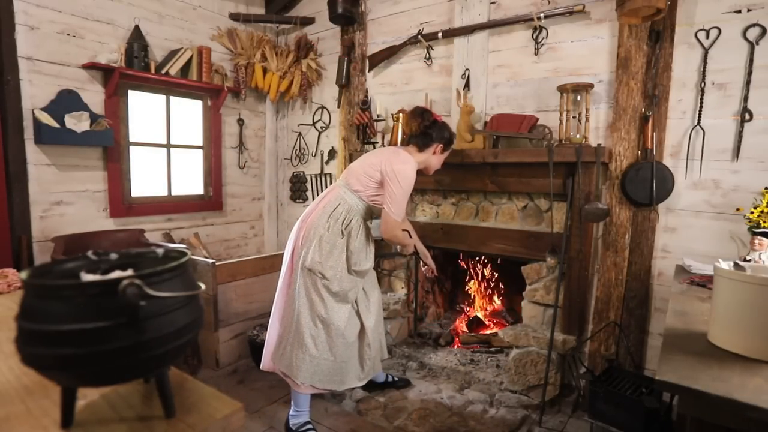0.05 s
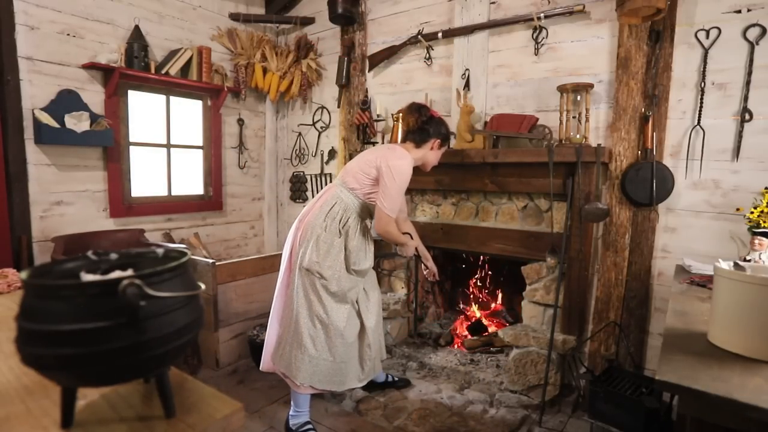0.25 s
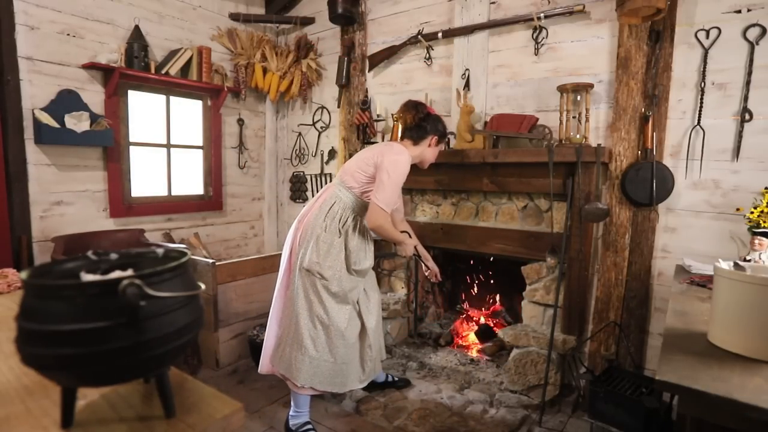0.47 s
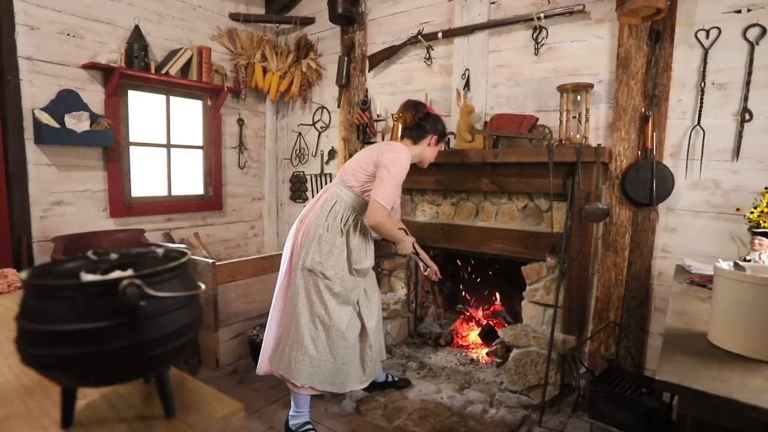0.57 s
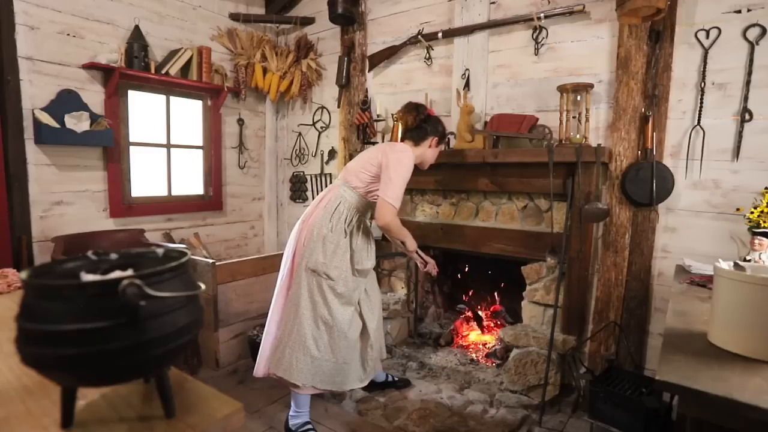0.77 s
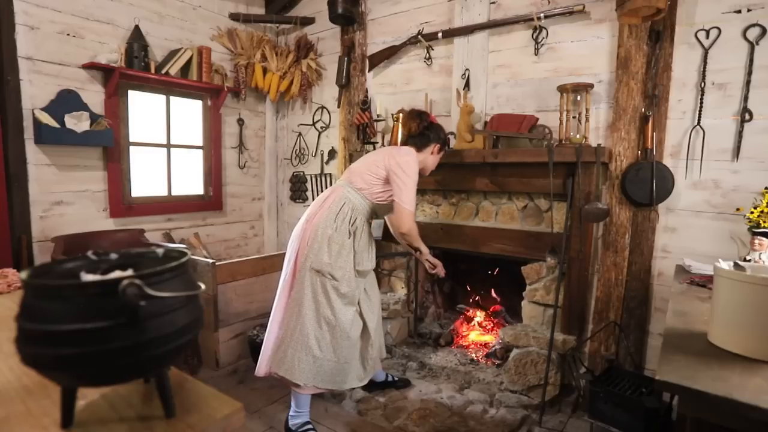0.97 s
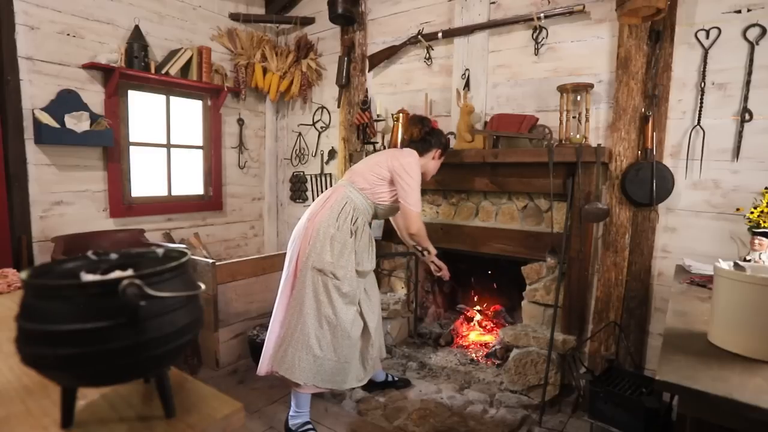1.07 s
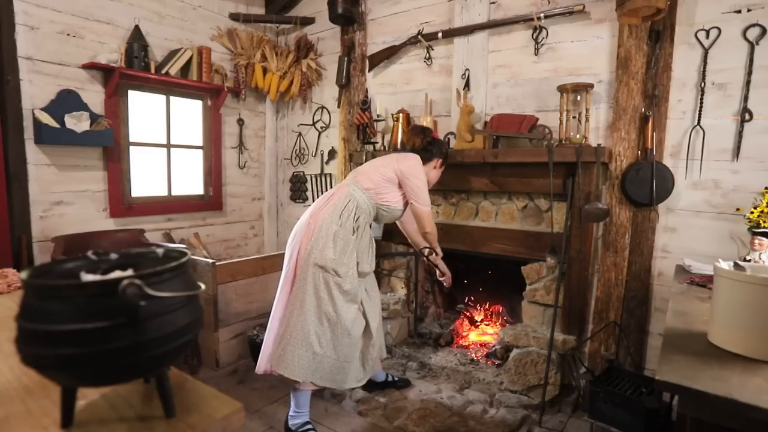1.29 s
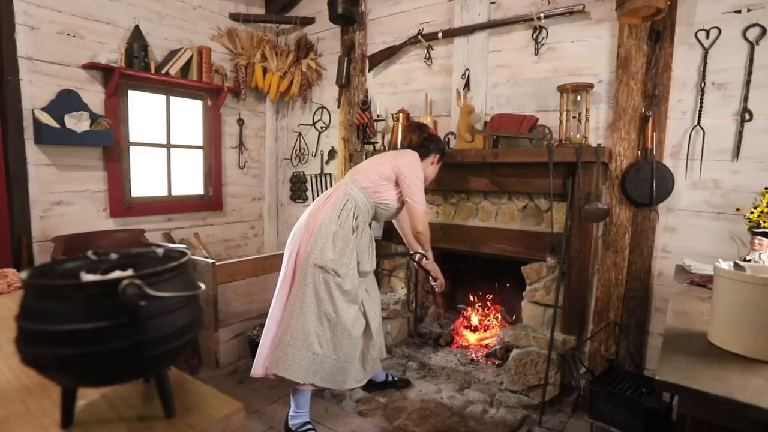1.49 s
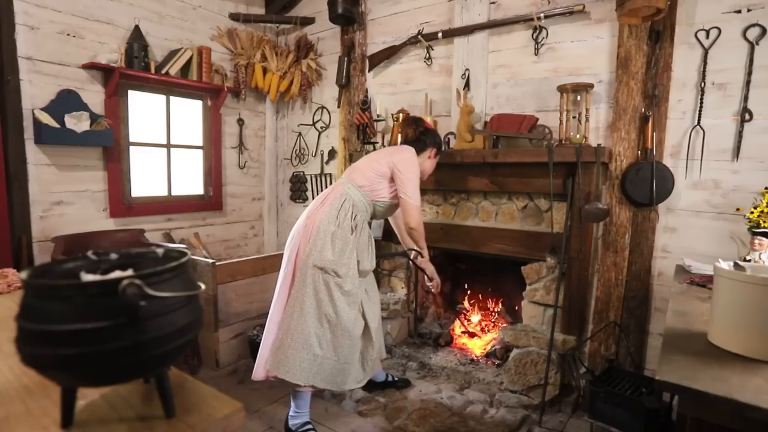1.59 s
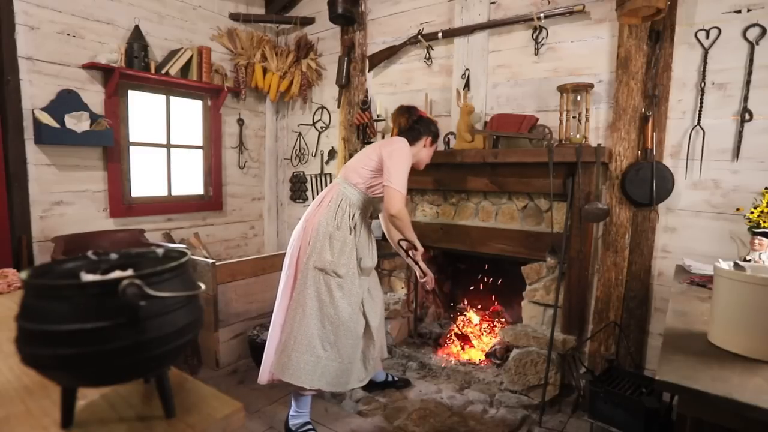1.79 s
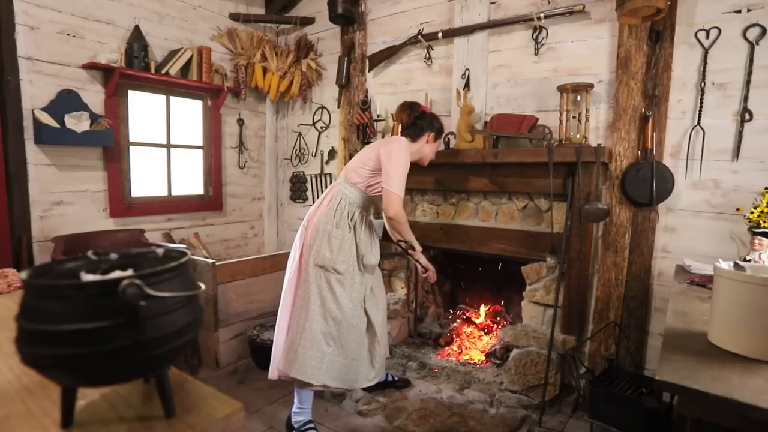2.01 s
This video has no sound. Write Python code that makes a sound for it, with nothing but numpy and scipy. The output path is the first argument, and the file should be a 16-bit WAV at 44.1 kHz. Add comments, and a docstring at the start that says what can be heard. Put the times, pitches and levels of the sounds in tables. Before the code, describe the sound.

An iron poker stirs a wood fire in two strokes, scraping and knocking against logs while brittle coals crunch and tinkle. The wood snaps now and then over faint crackle, heard from nearby in a small room.

```python
"""An iron poker works a wood fire in the stone hearth of a small room.
Its tip sticks and slips through two strokes and knocks on wood and coal, so iron and hearth ring.
The brittle coals crunch, tinkle and clink as they are pushed aside, and logs shift with dull thumps.
The burning wood snaps now and then over faint crackle and a quiet, steady burning noise."""
import sys
import numpy as np
from scipy import signal
from scipy.fft import rfft, irfft, next_fast_len
from scipy.io import wavfile

SR = 44100
rng = np.random.default_rng(int(sys.argv[2]) if len(sys.argv) > 2 else 0)


def master(y):
    """Save y as 16-bit WAV."""
    cut = np.clip(np.atleast_2d(y).T, -1, 1)
    pcm = np.round(cut * 32767)  # scale
    wavfile.write(sys.argv[1], SR, pcm.astype(np.int16))


N = 90404
TIME = np.arange(N) / SR

# how long the room's echo takes to fade by 60 dB: f/Hz, fade/s
ROOM_FADE = [(150, 0.57), (1000, 0.36), (2600, 0.45), (6000, 0.24), (14000, 0.21)]
# the tone of each sound, from bass to treble: f/Hz, level/dB
BURNING_TONE = [(20, -11), (32, -9), (52, -1.5), (80, -6), (120, 4.5), (160, 5), (300, -2), (600, -4),
                (1500, -9.5), (2400, -9.5), (3300, -11.5), (4000, -14.5), (8000, -15.5), (16000, -24.5)]
SNAP_TONE = [(200, -12), (1500, -1.5), (3000, 2), (5500, -5.5), (8500, -4), (10500, 4), (13000, 0.5),
             (16000, -4.5)]
HOLLOW_TONE = [(150, -12), (500, -22), (1000, -6), (1500, -2.5), (2000, 1.5), (2600, -2), (3600, -8.5),
               (12000, -16)]
EMBER_TONE = [(70, -41), (250, -19.5), (900, -11.5), (2500, -6.5), (4800, -1), (7500, -3), (10500, -3),
              (13000, -5), (16000, -9.5)]
KNOCK_TONE = [(60, -32), (180, -21), (450, -8.5), (850, -7.5), (1300, -9), (1900, -5), (2650, -0.5),
              (3400, -8), (6000, -11), (15000, -23)]
DRAG_TONE = [(60, -36), (170, -15), (300, -9), (480, -11), (660, -2), (900, -4), (1500, -3), (2650, 2.5),
             (3400, -7), (6000, -14.5), (15000, -28)]
PUSH_TONE = [(70, -29), (140, -9), (300, -6.5), (650, -0.5), (850, -1), (1250, 0.5), (1750, -3),
             (2600, 2.5), (3400, -7), (6000, -15), (15000, -36)]
# pitches at which things ring (narrow ones ring longer): f/Hz, width/Hz, level/dB
BURNING_WHISTLES = [(2270, 90, 2), (3180, 57, 12)]
HOLLOW_RINGS = [(1530, 230, 3.5), (2530, 190, 9)]
LOG_AND_IRON_RINGS = [(452, 66, 5.5), (1145, 80, 1.5), (1954, 160, 3.5), (2505, 230, 4), (2860, 95, 8.5),
                      (3500, 165, 9.5)]
POKER_AND_HEARTH_RINGS = [(278.6, 11, 4.5), (621, 10.5, 0), (672, 17, -9.5), (1034, 9.1, -12.5),
                          (1268, 153, -7), (1810, 10, -5), (2332, 11, -8.5), (2655, 40, -12),
                          (2775, 40, -5), (3130, 14, 4), (3810, 19, 1.5), (5044, 28, 4), (5350, 16, -27),
                          (6747, 17, 1), (9402, 30, -25)]
# the burning wood snaps: t/s, level/dB
WOOD_SNAPS = [(0.031, -39), (0.3609, -21), (0.7842, -43), (0.8084, -33), (.9175, -18), (1.4354, -23),
              (1.496, -23), (1.869, -32), (1.9961, -40)]
# logs thump and bits of charcoal clink: t/s, f/Hz, level/dB, time to fade by 60 dB/s
LOG_THUMPS = [(.38, 131, -47, 0.2), (.445, 453, -28.5, 0.12), (.556, 281, -38, 0.39),
              (.568, 662, -26, 0.091), (.82, 159, -47.5, 0.18), (.918, 156, -45, .12),
              (1.185, 652, -31, 0.22), (1.225, 120, -46, .12), (1.61, 223, -34.5, 0.21),
              (1.66, 620, -24, .15), (1.8, 283, -42, 0.27)]
COAL_CLINKS = [(.457, 4900, -33, 0.1), (.459, 5272, -31, 0.14), (.466, 2328, -33, 0.051),
               (.672, 2818, -41.5, 0.45), (.675, 2653, -35.5, 0.23), (1.165, 9932, -23, 0.082),
               (1.165, 5270, -28.5, 0.085), (1.165, 4591, -27, 0.089), (1.182, 2336, -27.5, 0.22),
               (1.183, 1257, -32.5, 0.33), (1.202, 9399, -24.5, 0.1), (1.203, 6145, -21, 0.092),
               (1.265, 3776, -34, .3), (1.28, 2016, -37, 0.17), (1.285, 2890, -34, .2),
               (1.29, 5280, -33, 0.14), (1.343, 6080, -39, .08), (1.425, 2110, -32, 0.077),
               (1.43, 2640, -31, 0.16), (1.465, 1296, -30.5, 0.21), (1.555, 8909, -32.5, 0.13),
               (1.599, 6080, -30, .07), (1.625, 4559, -28, 0.11), (1.781, 6605, -32.5, 0.17),
               (1.8, 2342, -39, .3)]
# how much the embers slide in each stroke, first a drag, then a push: t/s, level/dB
DRAG_SLIDE = [(0, -47), (.07, -58.5), (.2, -49.5), (.28, -47), (.31, -35.5), (.4, -39), (.45, -24.5),
              (.5, -49), (.52, -29), (.59, -41.5), (.68, -46), (.8, -54)]
PUSH_SLIDE = [(1.165, -30), (1.21, -36), (1.25, -38), (1.3, -35.5), (1.38, -44), (1.44, -36), (1.5, -30),
              (1.56, -27.5), (1.655, -35.5), (1.685, -25), (1.715, -43), (1.735, -27.5), (1.768, -57),
              (1.785, -32), (1.84, -55), (1.878, -40), (1.97, -60)]
# the poker hits wood and coal: t/s, knock level/dB, crunch level/dB, crumbling time/s
POKER_HITS = [(0.3408, -30, -46, 0.0021), (0.4256, -29, -31, 0.0078), (0.4275, -21, -32, 0.0064),
              (0.437, -14, -20.5, 0.0064), (0.446, -25, -26, .005), (.488, -33, -34, .002),
              (0.514, -22, -28, 0.005), (1.1656, -35, -24, 0.019), (1.181, -22, -16.5, 0.0069),
              (1.202, -26, -19, 0.0098), (1.2202, -27.5, -27, 0.014), (1.468, -34.5, -38, 0.011),
              (1.558, -39.5, -28, 0.014), (1.677, -33.5, -28.5, 0.0077), (1.729, -28.5, -29, 0.0076),
              (1.744, -34, -28.5, 0.0066), (1.869, -44.5, -42, 0.018)]
# how hard the poker scrapes in each stroke: t/s, level/dB
DRAG_FORCE = [(0, -39), (.08, -59.5), (.115, -41.5), (.205, -43), (.238, -29), (.28, -37.5), (.34, -32.5),
              (.42, -31), (.47, -31), (.53, -29.5), (.6, -34), (.71, -45), (.78, -49), (.84, -75)]
PUSH_FORCE = [(1.17, -42.5), (1.19, -23), (1.25, -46), (1.3, -34.5), (1.38, -51.5), (1.44, -35.5),
              (1.56, -28), (1.68, -27.5), (1.715, -30.5), (1.74, -24.5), (1.78, -41), (1.84, -52),
              (1.89, -42.5), (1.98, -67)]


def from_db(db):
    """Turn decibels into a number to multiply the sound by."""
    return 10 ** (np.asarray(db) / 20)


def unit_level(x):
    """Scale a signal so that its average level (rms) is 1."""
    return x / np.sqrt(np.mean(x ** 2) + 1e-20)


def at_hz(table, hz):
    """Read a table at any pitch, giving each octave equal space."""
    freqs, values = np.transpose(table)
    return np.interp(np.log(np.maximum(hz, 1)), np.log(freqs), values)


def gain_curve(table):
    """Join times and levels into a volume curve, silent before and after."""
    times, db = np.transpose(table)
    return from_db(np.interp(TIME, times, db, left=-120, right=-120))


def colour(x, tone):
    """Give a sound its tone, with a filter that keeps the power of plain noise the same."""
    size = 2 * next_fast_len(N)
    gains = unit_level(from_db(at_hz(tone, np.arange(size // 2 + 1) * SR / size)))
    cepstrum = irfft(np.log(gains))
    # fold the filter forward in time, so nothing sounds before the click that causes it
    cepstrum[1:size // 2] *= 2
    cepstrum[size // 2 + 1:] = 0
    return irfft(rfft(x, size) * np.exp(rfft(cepstrum)))[:N]


def flicker(depth_db, rate_hz):
    """A volume that wanders up and down at random."""
    r = np.exp(-2 * np.pi * rate_hz / SR)
    wander = signal.lfilter([1], [1, -2 * r, r * r], rng.standard_normal(2 * N))[N:]
    return from_db(depth_db * unit_level(wander))


def clicks(per_s, spread_db):
    """Random clicks; a spread above 0 makes a few louder, below 0 a few softer."""
    sizes = from_db(spread_db * np.minimum(rng.exponential(1, N), 5))
    signs = rng.choice([-1, 1], N)
    return unit_level(sizes * signs * (rng.random(N) < per_s / SR))


def bursts(times, levels_db, decays_s):
    """Something cracks: each time, a rush of tiny breaks starts at once and dies away."""
    power = 0
    for start, db, decay in np.broadcast(times, levels_db, decays_s):
        fade = (TIME >= start) * np.exp(-np.maximum(TIME - start, 0) / decay)
        power += (from_db(db) * fade) ** 2
    return np.sqrt(power) * rng.standard_normal(N)


def ringing(x, rings):
    """Add the ringing of an object that is shaken by the sound."""
    out = x.copy()
    for hz, width_hz, db in rings:
        r = np.exp(-np.pi * width_hz / SR)
        feedback = [1, -2 * r * np.cos(2 * np.pi * hz / SR), r * r]
        out += from_db(db) * signal.lfilter(np.array([1, 0, -1]) * (1 - r * r) / 2, feedback, x)
    return out


def pings(rows):
    """Struck pieces ring briefly, each on its own pitch."""
    out, t = np.zeros(2 * N), TIME[:SR // 3]
    for start_s, hz, db, fade_s in rows:
        start = int(start_s * SR)
        fade = np.exp(-np.log(1000) * t / fade_s)
        out[start:start + len(t)] += from_db(db) * np.sin(2 * np.pi * hz * t) * fade
    return out[:N]


def room_echo(x, gap_s=0.00309):
    """The walls throw back a blur of echoes that dies sooner in the treble."""
    t, tail = TIME[:SR // 2], 0
    edges_hz = np.geomspace(60, 18000, 10)
    for low, high in zip(edges_hz, edges_hz[1:]):
        band_filter = signal.butter(2, [low, high], "band", fs=SR, output="sos")
        band = signal.sosfilt(band_filter, rng.standard_normal(len(t)))
        tail += band * np.exp(-np.log(1000) * t / at_hz(ROOM_FADE, np.sqrt(low * high)))
    tail *= t > gap_s
    return signal.fftconvolve(x, tail / np.sqrt(np.sum(tail ** 2)))[:N]


def burning():
    """The fire burns with a quiet, steady noise that holds two faint whistles."""
    return from_db(-54.5) * ringing(colour(rng.standard_normal(N), BURNING_TONE), BURNING_WHISTLES)


def wood_snaps():
    """Burning wood snaps over a faint crackle, and the hollow fireplace answers each snap."""
    times, db = np.transpose(WOOD_SNAPS)
    snaps = bursts(times, db, decays_s=0.0016)
    crackle = from_db(-63) * clicks(per_s=330, spread_db=-3)
    hollow = colour(bursts(times, db - 17, decays_s=0.0092), HOLLOW_TONE)
    return colour(snaps + crackle, SNAP_TONE) + ringing(hollow, HOLLOW_RINGS)


def loose_pieces(stirring, per_s, low_hz, high_hz, gain_db, spread_db=2.5, fade_s=0.048, tries=1500):
    """Pieces knock together at random, as hard as they are stirred."""
    chance = rng.random((tries, 4))
    happens = chance[:, 3] < per_s * TIME[-1] / tries
    when, pitch, size, _ = chance[happens].T
    times = when * TIME[-1]
    hz = low_hz * (high_hz / low_hz) ** pitch
    db = 20 * np.log10(np.interp(times, TIME, stirring)) + gain_db + spread_db * (2 * size - 1)
    return pings(np.broadcast(times, hz, db, fade_s))


def charcoal(sliding):
    """Small bits tinkle as the embers slide, bigger lumps clack under the poker, and a few clink."""
    force = gain_curve(DRAG_FORCE) + gain_curve(PUSH_FORCE)
    tinkles = loose_pieces(sliding, per_s=340, low_hz=3294, high_hz=11870, gain_db=-4)
    clacks = loose_pieces(force, per_s=90, low_hz=937.5, high_hz=3073, gain_db=-1.5)
    clinks = pings(COAL_CLINKS) * flicker(depth_db=2.5, rate_hz=32)
    return tinkles + clacks + clinks


def ember_crunch(sliding):
    """Brittle coals crunch in clumps as they are pushed aside."""
    crunch = clicks(per_s=4500, spread_db=0) * flicker(depth_db=3.05, rate_hz=155)
    return colour(unit_level(crunch) * sliding, EMBER_TONE)


def poker_knocks():
    """Each blow makes log and iron ring and crushes burnt wood with a bright crunch."""
    times, knock_db, crunch_db, crumble_s = np.transpose(POKER_HITS)
    knock = colour(bursts(times, knock_db, crumble_s), KNOCK_TONE)
    crunch = colour(bursts(times, crunch_db, crumble_s), EMBER_TONE)
    return ringing(knock, LOG_AND_IRON_RINGS) + crunch


def poker_scrape(force, tone):
    """The poker's tip sticks and slips over wood and stone; each slip is a tiny click."""
    slips = clicks(per_s=5000, spread_db=1.5) * flicker(depth_db=1.56, rate_hz=70)
    return colour(unit_level(slips) * gain_curve(force), tone)


def scene():
    """The poking and the snaps echo in the room, over the steady noise of burning."""
    sliding = gain_curve(DRAG_SLIDE) + gain_curve(PUSH_SLIDE)
    scrapes = poker_scrape(DRAG_FORCE, DRAG_TONE) + poker_scrape(PUSH_FORCE, PUSH_TONE)
    contacts = scrapes + ember_crunch(sliding) + poker_knocks()
    poking = ringing(contacts, POKER_AND_HEARTH_RINGS) + charcoal(sliding) + pings(LOG_THUMPS)
    snaps = wood_snaps()
    direct = from_db(-2) * poking + snaps + burning()
    echo = room_echo(from_db(-6.5) * poking + from_db(-10) * snaps)
    return (direct + echo)[None]


def record(dry, cutoff_hz=15800):
    """Cut the very highest treble steeply."""
    return signal.fftconvolve(dry, signal.firwin(601, cutoff_hz, fs=SR)[None], mode="same")


dry = scene()
out = record(dry)
master(out)
```